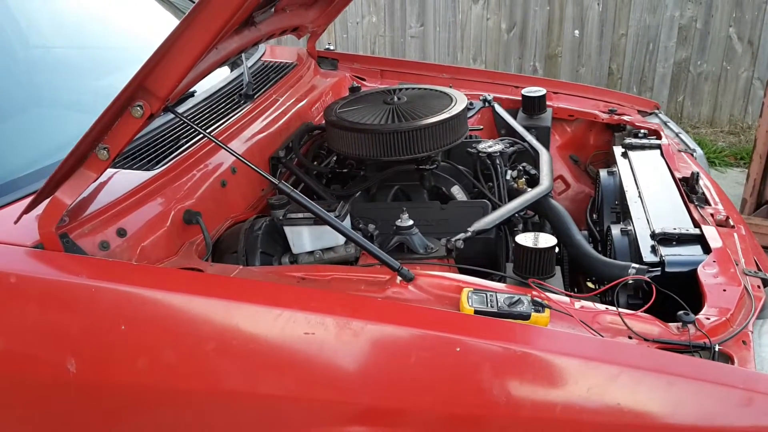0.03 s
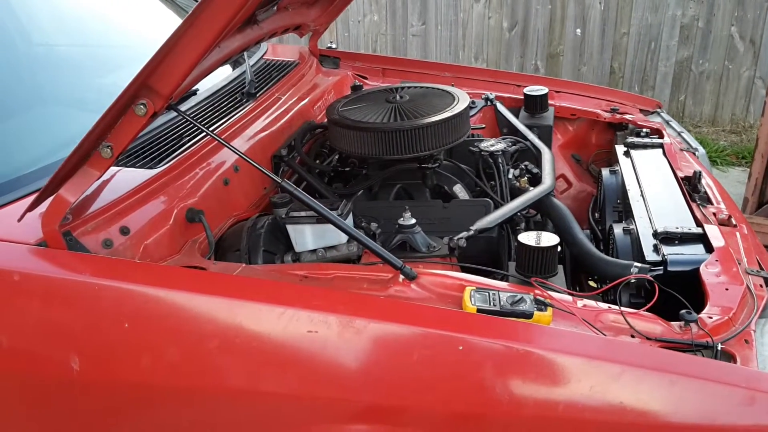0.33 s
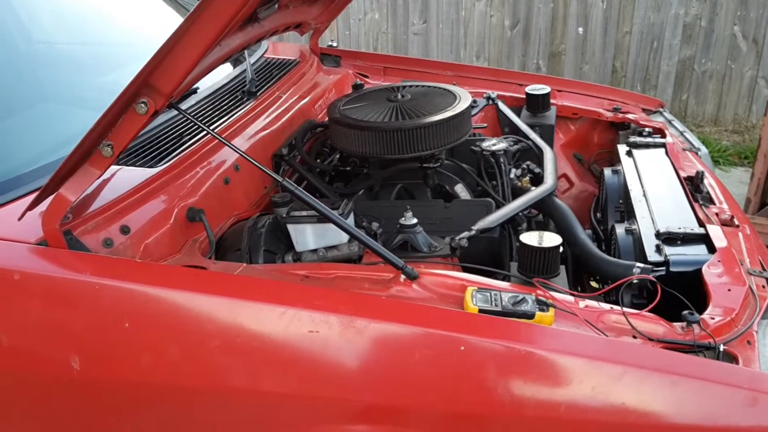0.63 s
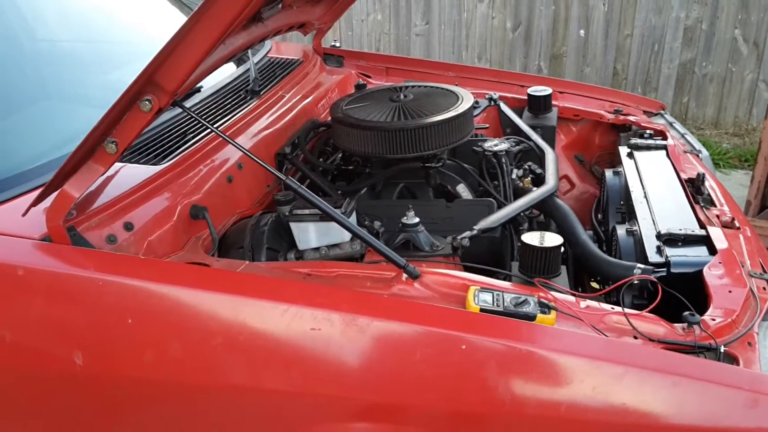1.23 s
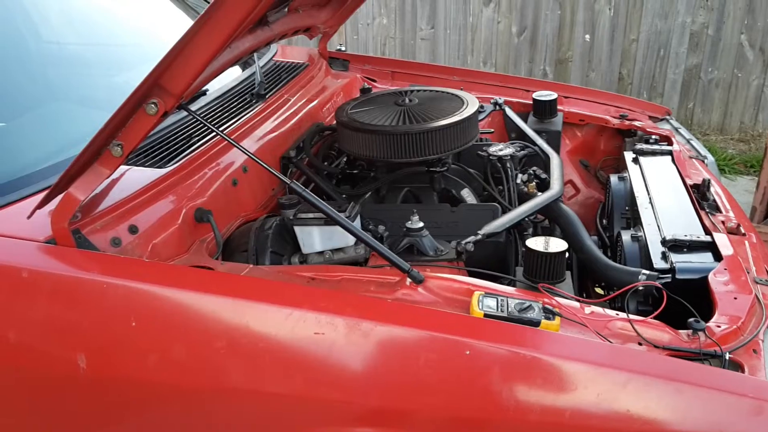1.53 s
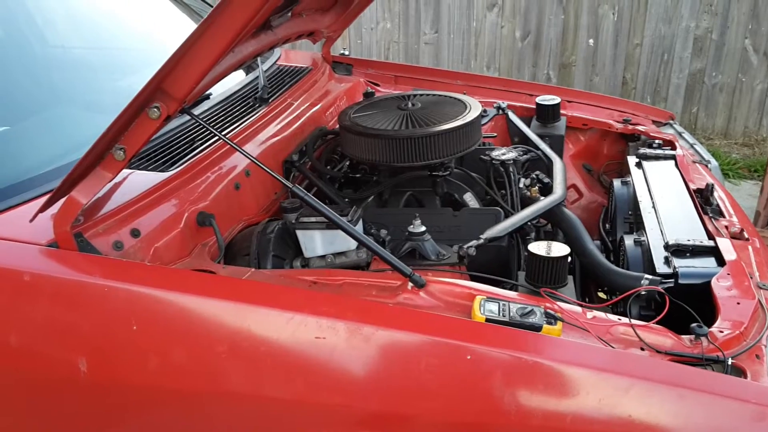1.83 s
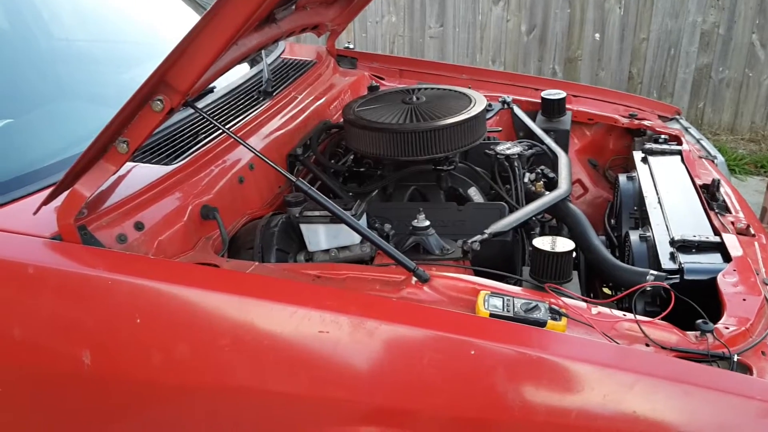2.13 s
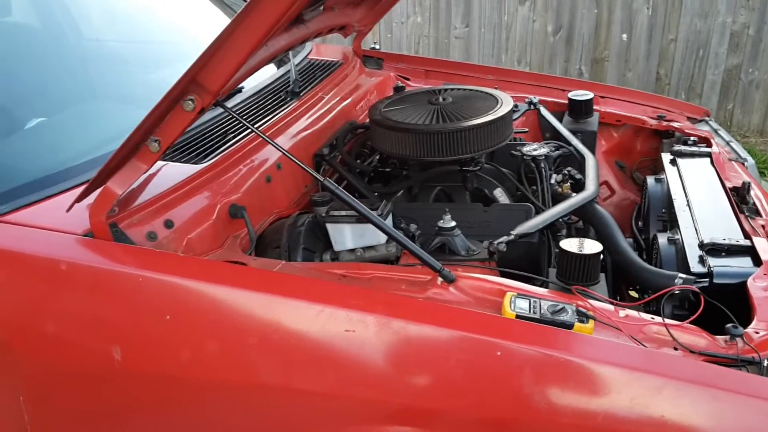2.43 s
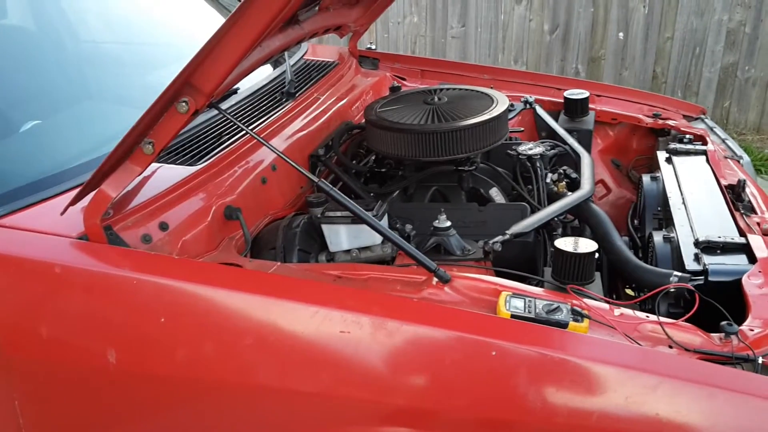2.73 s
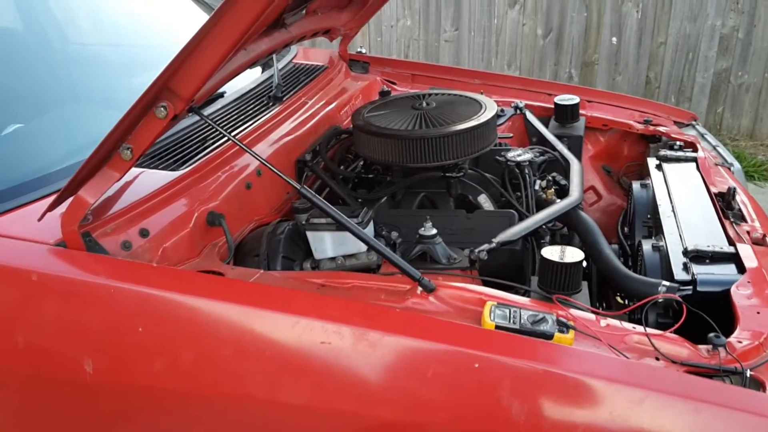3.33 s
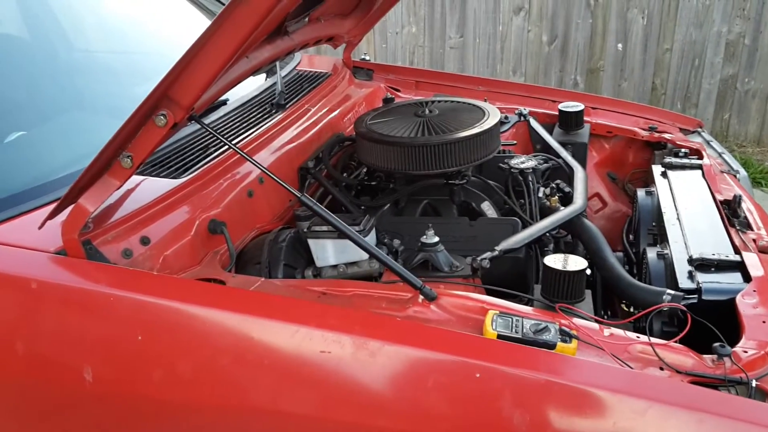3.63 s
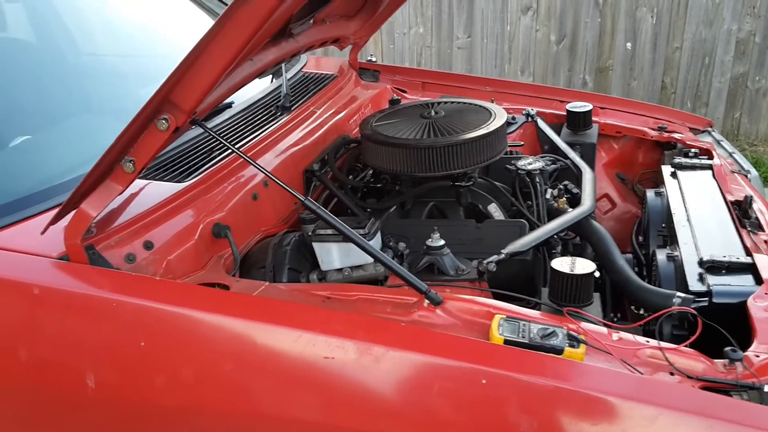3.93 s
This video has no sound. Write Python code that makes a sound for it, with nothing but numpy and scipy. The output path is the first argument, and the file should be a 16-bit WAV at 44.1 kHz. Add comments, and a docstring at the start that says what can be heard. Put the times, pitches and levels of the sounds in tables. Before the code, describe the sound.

A car engine starts with a short starter whine, then idles with booming exhaust and clatter.

```python
"""A V8 engine starts under its open hood and settles into a lumpy fast idle, heard from beside the fender.
First the starter's gears whine through two compressions, then the engine catches with a sharp spit.
Uneven puffs of gas make the exhaust pipes boom, the intake throbs once a turn, the valves clatter,
air whistles past the throttle and the fan and belts hiss. The hood and panels scatter the whine,
clatter and hiss, over a faint outdoor background."""
import sys
import numpy as np
from scipy import signal
from scipy.fft import rfft, irfft
from scipy.io import wavfile
from scipy.ndimage import map_coordinates

SR = 44100
rng = np.random.default_rng(int(sys.argv[2]) if len(sys.argv) > 2 else 0)


def persist_wave(psi):
    """Save psi, clipped to +-1, as 16-bit WAV."""
    counts = np.round(np.clip(psi, -1, 1) * 32767).astype(np.int16)
    wavfile.write(sys.argv[1], SR, np.atleast_2d(counts).T)


N = 176400
T = np.arange(N) / SR
HZ = np.maximum(np.arange(N + 1) * SR / (2 * N), 1e-3)  # the frequencies a filter acts on

# how fast the engine turns (time [s], speed [rpm])
ENGINE_SPEED = [(.8, 666), (1, 658), (1.2, 650), (1.4, 645), (1.6, 664), (1.8, 708), (2, 754), (2.2, 790),
                (2.5, 795), (2.8, 791), (3.1, 785), (3.4, 787), (3.7, 779), (4, 751)]
# the eight exhaust puffs of a two-turn cycle (level [dB], lateness [ms])
CYLINDER_PUFFS = [(6, 2.87), (4.3, 5.6), (4.5, 5.1), (2.5, 2.4), (5, 5.4), (4.8, 3.27), (5.4, 3.81),
                  (2.5, 1.85)]
# notes the exhaust pipes ring at (pitch [Hz], width [Hz], level [dB])
PIPE_NOTES = [(87, 6.9, -2), (117, 8.2, -0.9), (132.1, 5.1, -4.5), (152.3, 10.8, 0.7), (169.4, 22.6, 1),
              (210.8, 51, -2.5), (226.8, 47.6, -3.5), (308, 9.2, -19)]
# tone of a puff's dull thump (frequency [Hz], level [dB])
THUMP_TONE = [(15, -54), (45, -13), (70, -28), (100, 3), (180, -1.5), (260, -13.5), (400, -29.5),
              (1000, -45), (8000, -108)]
# strength of the exhaust's boom (time [s], level [dB])
BOOM_LEVEL = [(.8, -42), (.85, -21), (.95, -24), (1.03, -20), (1.15, -22.5), (1.35, -14), (1.7, -19.5),
              (2.05, -18.5), (2.3, -15.5), (3, -17), (3.5, -18), (4, -20.5)]
# drones at 2 and 4 times the firing rate (time [s], lower drone [dB], upper drone [dB])
DRONE_LEVELS = [(.8, -60, -62), (.93, -33, -19), (1, -27, -19), (1.06, -37, -14.5), (1.15, -19.5, -18.5),
                (1.3, -33, -14), (1.45, -19, -14), (1.6, -13.5, -20.5), (1.8, -16, -17), (1.98, -14, -31),
                (2.1, -29, -36), (2.4, -56, -35), (3.6, -27.5, -23.5), (3.8, -20, -43), (4, -19.5, -40)]
# the first hard firings (time [s], peak level [dB])
FIRST_PUNCHES = [(.820, -14), (0.844, -8), (0.863, -5.5), (0.881, -7), (.897, -5), (0.92, -7), (0.961, -5),
                 (0.974, -10), (0.989, -4.5), (1.002, -8)]
# speed and strength of the starter's gears (time [s], tooth rate [Hz], level [dB])
STARTER_RUN = [(.14, 59.6, -58), (.155, 98.3, -49), (.172, 121, -30.5), (.2, 160, -23), (.245, 165, -28),
               (.3, 180, -24), (.36, 206, -23.5), (.42, 228, -22.5), (.5, 206, -21.5), (.55, 186, -22.5),
               (.572, 176, -29.5), (.623, 170, -29.5), (.634, 210, -23), (.66, 250, -20.5),
               (.72, 270, -26.5), (.765, 275, -24), (.788, 288, -17.5), (.86, 299.2, -24),
               (1.03, 261.9, -28), (1.1, 252, -23.5), (1.17, 235.5, -31), (1.45, 168.4, -33.5)]
# the starter's hum (time [s], level [dB])
HUM_LEVEL = [(.4, -80), (.47, -65), (.505, -27), (.54, -47), (.6, -80)]
# tone of the gear teeth (frequency [Hz], level [dB])
GEAR_TONE = [(35, -30), (90, -6), (150, -8), (210, -2.5), (310, -5.5), (560, -12), (700, -1.5), (790, -1),
             (915, 1), (1190, 2.5), (1450, -7), (1620, -5), (1850, -5), (2400, -12.5), (4200, -17),
             (5800, -29), (15000, -33)]
# bands of gear whirr (pitch [times the tooth rate], level [dB])
WHIRR_BANDS = [(4, -10.5), (5, -12), (6.3, -12.5), (8.6, -13)]
# sharp spits (time [s], level [dB], fade time [s])
SPIT_BURSTS = [(0.194, -26.5, 0.02), (0.628, -34.5, 0.028), (0.697, -14.5, 0.028)]
# tone of a spit (frequency [Hz], level [dB])
SPIT_TONE = [(1200, -2), (2500, -3), (4500, 4.5), (6000, -2.5), (10500, -1), (15500, -7)]
# the running engine (time [s], clatter and intake [dB], ringing and whistle [dB], hiss [dB])
RUNNING_LEVELS = [(.72, -43, -60, -66), (.79, -26, -38, -31), (.86, -26.5, -39, -25.5),
                  (1.02, -25, -32.5, -29.5), (1.4, -23, -31, -26.5), (1.85, -25.5, -32, -28.5),
                  (2.2, -23.5, -30.5, -26.5), (2.9, -23, -29.5, -26), (3.3, -23.5, -30.5, -25),
                  (4, -23, -30.5, -29.5)]
# tone of the valve clatter (frequency [Hz], level [dB])
CLATTER_TONE = [(25, -11), (60, -3), (300, 5), (450, -5), (850, -0.5), (1000, -4.5), (1300, -9),
                (2200, -6.5), (3100, -9), (3700, -21.5), (4700, -26), (5200, -21.5), (16000, -16.5)]
# notes the metal parts ring at (pitch [Hz], width [Hz], level [dB])
METAL_NOTES = [(1680, 9.2, -5.5), (2035, 14, -7), (2640, 6.4, -7), (2995, 11, -25)]
# notes the air intake rings at (pitch [Hz], width [Hz], level [dB])
INTAKE_NOTES = [(539, 15, -20), (668.3, 33, 1.5), (697, 52, 1.5), (731, 160, -8)]
# tone of the fan and belts (frequency [Hz], level [dB])
HISS_TONE = [(1500, -26), (4000, 0.5), (4700, -3), (4980, -6.5), (5300, -2), (6100, -7.5), (7200, -3),
             (8200, -8.5), (9200, -1.5), (10000, -4.5), (11800, 0), (14000, -12), (15600, -17)]
# tone of air passing the throttle (frequency [Hz], level [dB])
WHISTLE_TONE = [(3500, -30), (3950, -15.5), (4290, 4), (4380, -14), (4470, 6), (4590, 2.5), (4670, 1),
                (4750, 3), (4900, -33), (5400, -42)]
# tone of the outdoor background (frequency [Hz], level [dB])
YARD_TONE = [(30, 6), (135, 4.5), (420, -5), (660, -8), (750, 13), (850, -41), (2000, -26), (6000, -32),
             (15000, -13)]
# how much louder the left side is than the right (frequency [Hz], left minus right [dB])
SIDE_BALANCE = [(90, -1.5), (200, 0), (700, 1), (1100, -2), (2200, -2), (3200, 11), (4500, -7), (6500, 11),
                (9000, 8.5), (12500, 2)]


def exhaust(turns, catch_s=.77, jitter_s=.00045, uneven_db=3.6):
    """Four uneven puffs of gas a turn thump and ring the pipes, while two low notes drone."""
    times = crossings(4 * turns)
    db, late_ms = np.array(CYLINDER_PUFFS)[np.arange(len(times)) % len(CYLINDER_PUFFS)].T
    time_luck, size_luck = rng.standard_normal((len(times), 2)).T
    sizes = amp(db + uneven_db * np.tanh(size_luck)) * (times > catch_s)
    puffs = clicks(times + late_ms / 1000 + jitter_s * time_luck, sizes)
    pipes = highpass(ring(puffs, PIPE_NOTES), 82.6, order=6)
    thumps = amp(-16) * colour(puffs, THUMP_TONE)
    boom = (pipes + thumps) * amp(curve(BOOM_LEVEL)[0])
    firing_angle = 2 * np.pi * 4 * turns
    lower_db, upper_db = curve(DRONE_LEVELS)
    drone = amp(lower_db) * np.cos(2 * firing_angle) + amp(upper_db) * np.cos(4 * firing_angle)
    sound = boom + np.sqrt(2) * drone * (T > catch_s)
    width = amp(-14) * filtered(sound, 1j)  # a copy shifted a quarter wave spreads the sound out
    return np.array([sound + width, sound - width])


def first_firings():
    """Single dull punches leave the exhaust as the engine catches."""
    times, db = np.array(FIRST_PUNCHES).T
    thump = colour(signal.unit_impulse(N), THUMP_TONE)
    return filtered(clicks(times, amp(db)), rfft(thump / np.abs(thump).max(), 2 * N))


def starter(tooth_count=9, wear_s=.000338, jitter_s=.00015):
    """A small worn gear knocks and scrapes on a big one, slows on each compression, then spins down."""
    tooth_hz, db = curve(STARTER_RUN)
    teeth_passed = np.cumsum(tooth_hz) / SR
    times = crossings(teeth_passed)
    time_wear, size_wear = repeating_luck(tooth_count, len(times))
    times = times + wear_s * time_wear + jitter_s * rng.standard_normal(len(times))
    knocks = unit(clicks(times, 1 + .36 * size_wear))
    knocks = filtered(knocks, np.exp(-4.5j * np.sqrt(HZ)))  # the housing spreads each knock in time
    scrape = unit(np.exp(-(teeth_passed % 1)) * stereo_noise(0))
    whine = colour(knocks + amp(1) * scrape, GEAR_TONE)
    gears = engine_bay(whine + gear_whirr(teeth_passed), echo_db=-1, fade_s=.016)
    hum = np.sqrt(2) * np.sin(2 * np.pi * teeth_passed) * amp(curve(HUM_LEVEL)[0])
    return hum + gears * amp(db)


def gear_whirr(teeth_passed, width_hz=43):
    """Rough bands of noise rise and fall in pitch with the starter's speed."""
    angle = 2 * np.pi * teeth_passed
    return sum(amp(db) * (wander(width_hz) * np.cos(k * angle) + wander(width_hz) * np.sin(k * angle))
               for k, db in WHIRR_BANDS)


def spits():
    """Bright bursts jump out and fade fast as the starter engages and the engine catches."""
    loudness = sum(amp(db) * (T > at) * np.exp(-np.abs(T - at) / fade) for at, db, fade in SPIT_BURSTS)
    return colour(stereo_noise(6.7), SPIT_TONE) * loudness


def machinery(turns):
    """The valves, intake, throttle and fan all join in as the engine comes to life."""
    clatter_db, ringing_db, hiss_db = curve(RUNNING_LEVELS)
    clatter, ringing = valves(turns)
    sound = (ringing + throttle_whistle(turns)) * amp(ringing_db)
    sound += (clatter + intake(turns)) * amp(clatter_db)
    sound += fan_and_belts(turns) * amp(hiss_db)
    return sound * (T > RUNNING_LEVELS[0][0])


def valves(turns):
    """Sixteen valves tap away; gives their clatter and the ringing they set off in the metal."""
    rattle = taps(turns, count=16, uneven_db=2.5, fade_s=.0054) + amp(-4) * rng.standard_normal(N)
    rattle = rattle + amp(3.5) * highpass(rng.standard_normal((2, N)), 1270, order=2)
    clatter = engine_bay(colour(rattle, CLATTER_TONE), echo_db=-7.5, fade_s=.034)
    return clatter, amp(-9.5) * ring(rattle, METAL_NOTES)


def intake(turns, gulp_at_turn=.27, swell_at_turn=.34):
    """A gulp and a swell of rushing air, each once a turn, make the intake ring and throb."""
    gulps = unit(clicks(crossings(turns - gulp_at_turn), 1))
    draught = stereo_noise(-11) * (1 + .21 * np.cos(2 * np.pi * (turns - swell_at_turn)))
    return amp(-4.5) * ring(amp(-10.5) * gulps + draught, INTAKE_NOTES)


def fan_and_belts(turns):
    """The fan and belts hiss, with fine ticks that keep pace with the engine."""
    air = stereo_noise(7.4) + amp(1.5) * taps(turns, count=32, uneven_db=2.5, fade_s=.00055)
    return engine_bay(colour(air, HISS_TONE), echo_db=4, fade_s=.015)


def throttle_whistle(turns, waver_hz=12.5, waver_s=.00013):
    """Air whistles past the throttle, fluttering as the cylinders breathe in and wavering in pitch."""
    air = stereo_noise(-8.5) + taps(turns, count=8, uneven_db=3.5, fade_s=.018)
    read_at = (T + waver_s * wander(waver_hz)) * SR  # a drifting delay bends the pitch
    return np.array([map_coordinates(ear, [read_at], mode="mirror") for ear in colour(air, WHISTLE_TONE)])


def engine_bay(x, echo_db, fade_s):
    """The hood and panels add a blur of quick echoes, different at each ear."""
    tail = rng.standard_normal((2, N)) * np.exp(-T / fade_s)
    tail /= np.sqrt(np.sum(tail ** 2, axis=1, keepdims=True))
    tail = highpass(tail, 650, order=2)
    return unit(x + amp(echo_db) * filtered(x, rfft(tail, 2 * N)))


def yard():
    """A faint, steady rush of outdoor noise."""
    return amp(-52.5) * colour(rng.standard_normal(N) + .32 * rng.standard_normal((2, N)), YARD_TONE)


def taps(turns, count, uneven_db, fade_s):
    """Short rasps of noise, count of them every two turns, each with its own timing and strength."""
    times = crossings(turns * count / 2)
    time_luck, size_luck = repeating_luck(count, len(times))
    sizes = amp(uneven_db * size_luck + 1.2 * rng.standard_normal(len(times)))
    hits = clicks(times + .0015 * time_luck, sizes)
    power = np.maximum(filtered(hits ** 2, rfft(np.exp(-T / fade_s), 2 * N)), 0)
    return unit(np.sqrt(power) * rng.standard_normal(N))


def repeating_luck(period, length):
    """Two rows of random numbers that repeat after period steps."""
    return rng.standard_normal((period, 2))[np.arange(length) % period].T


def stereo_noise(apart_db):
    """Noise both ears share, plus each ear's own noise at apart_db."""
    return unit(rng.standard_normal(N) + amp(apart_db) * rng.standard_normal((2, N)))


def wander(hz):
    """A smooth random drift, with up to about hz wiggles a second."""
    return unit(filtered(rng.standard_normal(N), np.exp(-(HZ / hz) ** 2)))


def crossings(count):
    """Times at which a rising count passes a whole number."""
    return np.interp(np.arange(int(count[-1]) + 1), count, T)


def clicks(times, sizes):
    """Clicks at the given times, each shared between two samples."""
    whole, part = np.divmod(np.clip(times * SR, 0, N), 1)
    whole = whole.astype(int)
    before = np.bincount(whole, sizes * (1 - part), N + 2)
    after = np.bincount(whole + 1, sizes * part, N + 2)
    return (before + after)[:N]


def ring(x, notes):
    """Let a sound ring at a set of notes; the result has strength 1."""
    response = sum((-1) ** k * amp(db) / (1 + 1j * (HZ ** 2 - pitch ** 2) / (HZ * width))
                   for k, (pitch, width, db) in enumerate(notes))
    return unit(filtered(x, response))


def colour(x, tone):
    """Shape a sound's lows and highs with a tone table; the result has strength 1."""
    hz, db = np.array(tone, float).T
    cepstrum = irfft(np.log(amp(np.interp(np.log(HZ), np.log(hz), db))))
    cepstrum[1:N] *= 2  # using only this half, doubled, makes the filter ring after a hit, not before
    return unit(filtered(x, np.exp(rfft(cepstrum[:N], 2 * N))))


def highpass(x, hz, order):
    """Turn down everything below hz."""
    return signal.sosfilt(signal.butter(order, hz, "high", fs=SR, output="sos"), x)


def filtered(x, response):
    """Scale and shift each frequency of a sound by the given response."""
    return irfft(rfft(x, 2 * N) * response)[..., :N]


def curve(table):
    """Each column of a timed table, joined by straight lines."""
    times, *columns = np.array(table, float).T
    return [np.interp(T, times, column) for column in columns]


def unit(x):
    """Scale to an average strength (rms) of 1."""
    return x / np.sqrt(np.mean(x ** 2))


def amp(db):
    """Turn decibels into a multiplier."""
    return 10 ** (np.asarray(db) / 20)


def scene():
    """Add up all the sounds; one count of engine turns keeps the exhaust and machinery in step."""
    turns = np.cumsum(curve(ENGINE_SPEED)[0]) / 60 / SR
    return first_firings() + exhaust(turns) + machinery(turns) + starter() + spits() + yard()


def record(dry, right_delay_s=.00004, top_hz=15850):
    """Each side has its own tone, the right hears a little later, and the highest treble is cut off."""
    hz, db = np.array(SIDE_BALANCE).T
    lean_db = np.interp(np.log(HZ), np.log(hz), db) / 2
    delay = np.exp(-2j * np.pi * HZ * right_delay_s)
    heard = filtered(dry, np.array([amp(lean_db), amp(-lean_db) * delay]))
    return signal.sosfilt(signal.ellip(12, .1, 80, top_hz, fs=SR, output="sos"), heard)


dry = scene()
out = record(dry)
persist_wave(out)
```